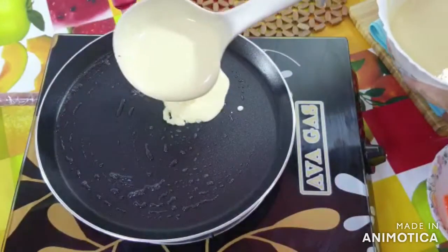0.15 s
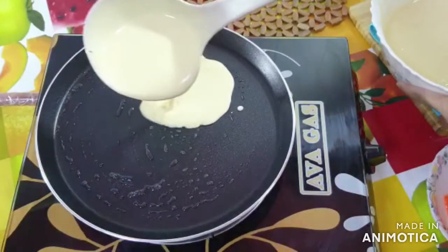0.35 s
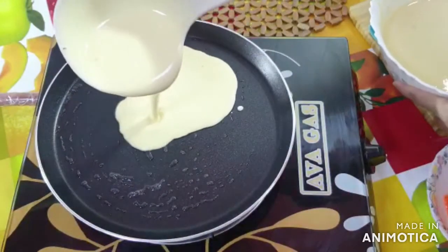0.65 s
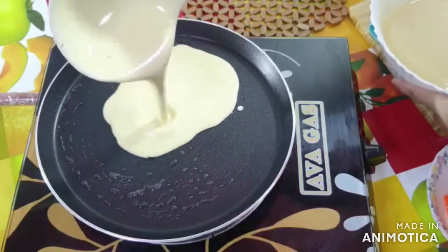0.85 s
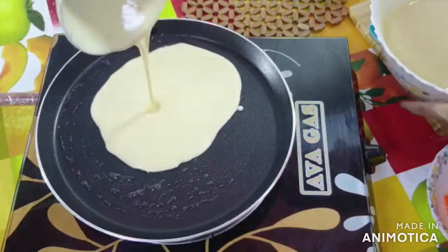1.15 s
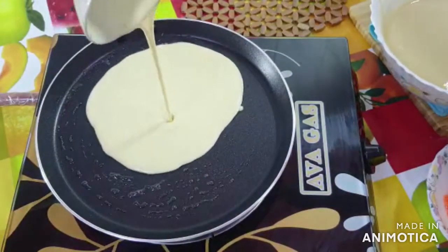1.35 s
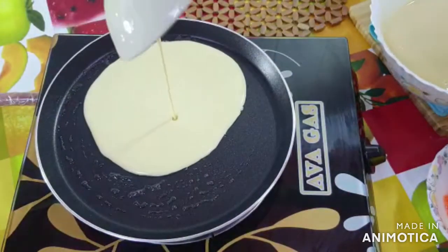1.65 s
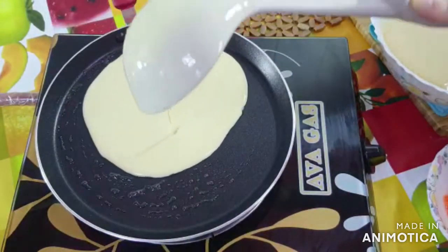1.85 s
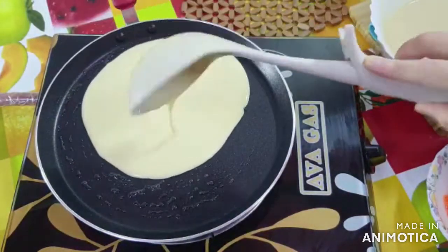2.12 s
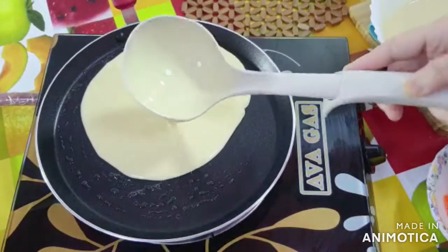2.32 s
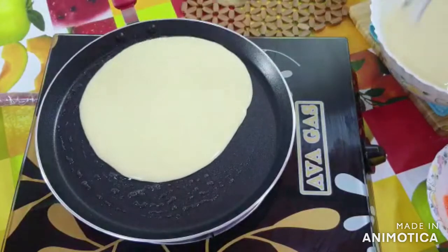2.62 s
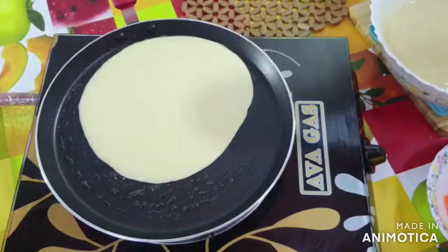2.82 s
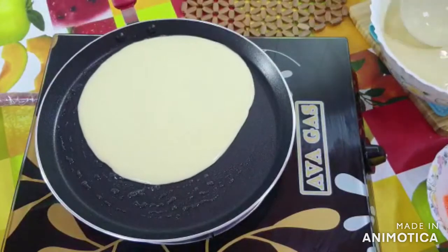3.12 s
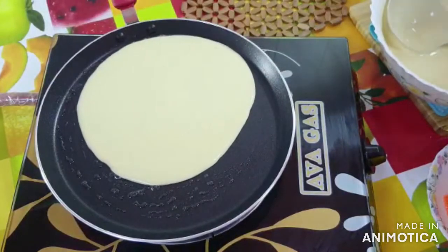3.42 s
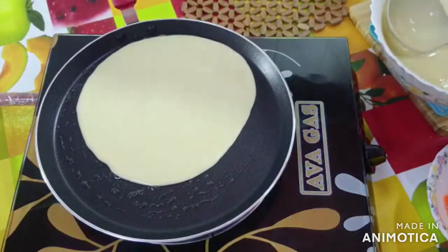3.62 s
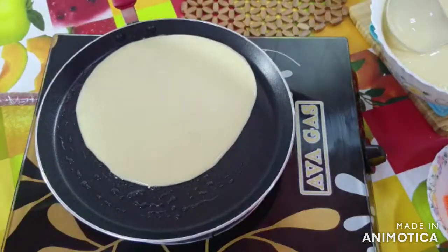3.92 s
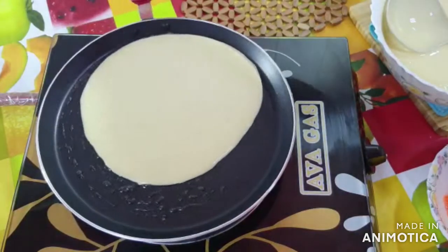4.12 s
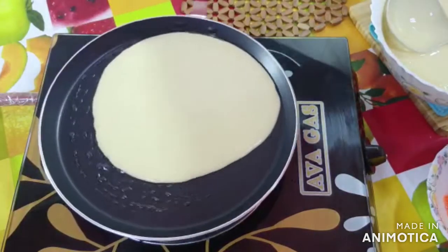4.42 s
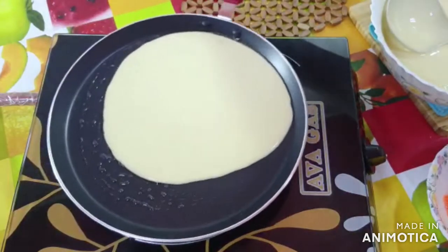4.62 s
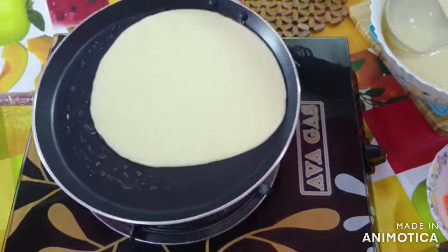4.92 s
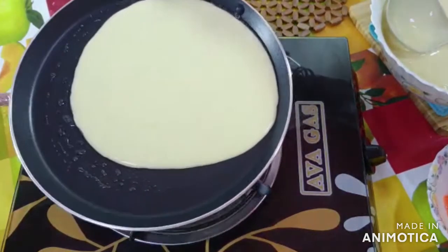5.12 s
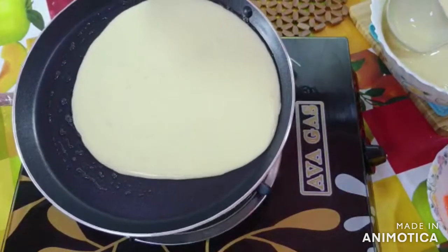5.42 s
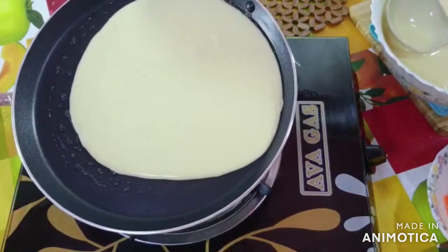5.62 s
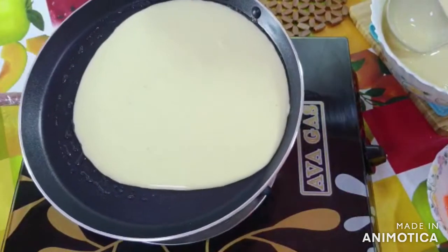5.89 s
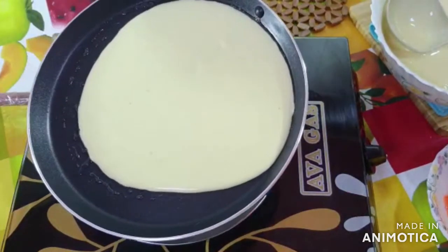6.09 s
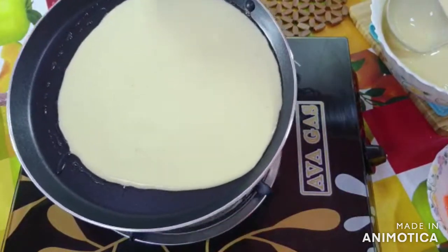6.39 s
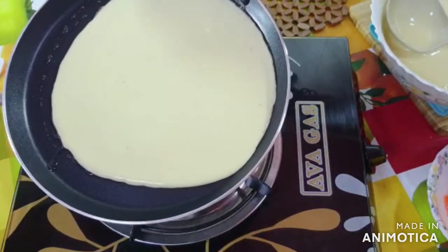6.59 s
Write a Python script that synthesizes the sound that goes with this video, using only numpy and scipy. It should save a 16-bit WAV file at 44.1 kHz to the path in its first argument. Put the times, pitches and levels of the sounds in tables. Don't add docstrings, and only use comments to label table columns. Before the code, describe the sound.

Batter hits an oiled pan with a loud crack and dense sizzle that thins out; later a bowl clanks and the pan scrapes across the stove.

```python
import sys
import numpy as np
from scipy import signal
from scipy.fft import rfft, irfft, next_fast_len
from scipy.io import wavfile
from scipy.ndimage import uniform_filter1d

SR = 44100
rng = np.random.default_rng(int(sys.argv[2]) if len(sys.argv) > 2 else 0)


def level_to_linear(level):
    exponent = np.asarray(level, float) / 20
    return 10 ** exponent


def generate_wav(sig):
    pcm = np.round(np.clip(np.atleast_2d(sig).T, -1, 1) * 32767).astype(np.int16)
    wavfile.write(sys.argv[1], SR, pcm)


N = 297675

# (frequency [Hz], level [dB], decay t60 [s])
STOVE = [(332, -6.5, 0.078), (362.6, 1, 0.15), (440, 2.5, 0.045), (531, 0, 0.049), (631, 1, 0.065),
         (754, -5, 0.2), (832, -11, 0.42), (1066, -6, 0.07), (1425, 5.5, 0.019), (1750, -0.5, 0.03),
         (2024, -7.5, 0.037)]


def evened(x):
    return x / np.sqrt(np.mean(x ** 2) + 1e-20)


def read(points, hz):
    f, value = np.transpose(points)
    return np.interp(np.log(hz + 1), np.log(f + 1), value)


def follow(rows, column, off_db=-120):
    times = [row[0] for row in rows]
    values = [row[column] for row in rows]
    return np.interp(np.arange(N) / SR, times, values, off_db, off_db)


def resonate(x, hz, width):
    r = np.exp(-np.pi * width / SR)
    return signal.lfilter([1, 0, -1], [1, -2 * r * np.cos(2 * np.pi * hz / SR), r * r], x)


def colour(x, points):
    size = next_fast_len(N)
    gain = level_to_linear(read(points, np.fft.rfftfreq(size, 1 / SR)))
    return irfft(rfft(x, size) * gain, size)[..., :N]


def bursts(per_s, spread_db, size=N):
    chance = rng.random((2, size))
    height = level_to_linear(spread_db * np.minimum(rng.exponential(1, (2, size)), 6))
    half = per_s / SR / 2
    return height * ((chance < half) * 1. - (chance > 1 - half))


def ring(modes, length=.7, upper_db=0, edge_hz=950, rough=0, crack_db=-40, clatter_db=-60):
    # (low [Hz], high [Hz])
    clatter_hz = (700, 6300)
    clatter_t60 = 0.24
    t = np.arange(int(length * SR)) / SR
    rise = np.minimum(t / 0.00039, 1)
    noise = rng.standard_normal(len(t))
    crack = level_to_linear(crack_db) * noise * np.exp(-t / 0.0017)
    clatter = signal.lfilter(*signal.butter(1, clatter_hz, "band", fs=SR), noise)
    sound = crack + level_to_linear(clatter_db - 60 * t / clatter_t60) * clatter
    for hz, db, t60 in modes:
        steps = rng.standard_normal((2, 40))
        steps[:, 0] = 0
        a, b = (np.interp(t, np.arange(40) * 0.0188, v) for v in steps)
        waver = (1 + .5 * rough * a) * np.exp(1.6j * rough * b)
        tone = (waver * np.exp(2j * np.pi * (hz * t + rng.random()))).real
        sound = sound + level_to_linear(db + upper_db * (hz > edge_hz) - 60 * t / t60) * tone
    return rise * sound


def add(mix, s, sound, peak_db, pan_db):
    part = mix[:, round(s * SR):][:, :len(sound)]
    sides = level_to_linear(peak_db + np.array([[pan_db], [-pan_db]]) / 2)
    part += (sides * sound / abs(sound).max())[:, :part.shape[1]]


def pops():
    # (time [s], peak [dB], pitch [Hz], ring [ms], broadband share [0-1])
    first_spit = [
        (.0014, -19, 1500, .8, .4),
    ]
    # (time [s], peak [dB], left minus right [dB])
    big_spit = (.0248, -4.5, -3.5)
    # (frequency [Hz], level [dB], decay t60 [s])
    pocket = [(790, -8, 0.0069), (1140, -17, 0.0046), (1540, -1, 0.0069), (1820, -5, 0.01),
              (2180, 0.5, 0.0089), (2920, 3.5, 0.0038), (3760, -0.5, 0.0053), (5960, -11, .004),
              (6530, -2.5, 0.0068), (7850, -19, .004), (10600, -5, 0.0035), (11970, -1, 0.008),
              (14000, -2, 0.0048)]
    # (time [s], peak [dB], pitch [Hz], ring [ms], broadband share [0-1])
    oil_pops = [(.0334, -16.5, 2300, 0.31, 0), (0.1498, -25.5, 7000, 0.85, 0.5),
                (1.1553, -26.5, 1970, 0.66, .5), (1.2224, -33.5, 1720, 1.6, 0.2),
                (1.4347, -19.5, 5940, 0.11, -0.07), (1.4688, -28, 2740, 0.46, 0),
                (1.4844, -28, 13000, .4, 1), (2.43, -22.5, 7500, 0.28, .6), (3.0834, -29, 14300, 1.1, 0.5),
                (4.3201, -32.5, 6300, 1, 0.5), (4.607, -32.5, 14000, .6, .5)]
    mix, t = np.zeros((2, N)), np.arange(900) / SR
    add(mix, big_spit[0], ring(pocket, length=.03, crack_db=-4.5), *big_spit[1:])
    noises = rng.standard_normal((len(oil_pops) + 1, 900))
    for (s, db, hz, ms, wide), noise in zip(first_spit + oil_pops, noises):
        share = np.clip(wide, 0, 1)
        snap = np.diff(noise, prepend=0) * np.exp(-t / 0.002) * 0.12
        bubble = np.sin(2 * np.pi * hz * t) * np.exp(-1000 * t / ms)
        add(mix, s + .0008, (1 - share) * bubble + share * snap, db, -1.5)
    return signal.sosfilt(signal.butter(2, 600, "high", fs=SR, output="sos"), mix)


def sizzle():
    # (frequency [Hz], level [dB])
    fizz_spectrum = [(850, -63), (1450, -4.5), (2280, -4), (4050, -2.5), (5200, -1), (5680, -2.5),
                     (6210, -1.5), (6730, -4), (7540, -2.5), (7910, -5), (10000, -8.5), (13000, -23),
                     (22000, -120)]
    # (frequency [Hz], level [dB])
    coarse_spectrum = [(150, -40), (250, -27), (283, -11.5), (425, -9.5), (551, -20), (785, -8), (862, -9),
                       (1060, -2.5), (1380, -5.5), (2150, -3), (3000, -7.5), (3900, -7.5), (6600, -120)]
    # (frequency [Hz], level [dB])
    spray_spectrum = [(5290, -25.5), (9000, -5), (13000, -1.5), (14200, -7), (15100, -2.5), (15700, -9)]
    # (time [s], vigour [dB])
    boil = [(0.0, -42.5), (0.15, -48), (0.6, -46.5), (1.37, -48), (1.56, -50), (1.73, -53), (2.42, -54),
            (2.97, -56.5), (3.19, -56), (3.44, -60.5), (3.85, -61), (4.1, -63.5), (4.64, -61), (5.36, -61),
            (5.64, -57), (5.86, -56), (6.11, -56), (6.75, -54.5)]
    # (time of peak [s], rise [s], fall [s], gain [dB])
    flares = [
        (0.001, .01, 0.18, 2.5),
        (3.55, 0.13, 0.2, 5.5),
        (4.35, 0.31, 0.26, 6),
    ]
    t, boil_db = np.arange(N) / SR, follow(boil, 1)
    vigour_db = boil_db + 55
    flare_db = np.zeros(N)
    for s, rise, fall, db in flares:
        flare_db += db * np.clip(np.minimum(1 + (t - s) / rise, 1 - (t - s) / fall), 0, 1)
    spread_s, spread_db = 1.1, -2.5
    sets_s, setting_db_per_s = 1.65, -3
    coarse_db = -58 + 0.93 * vigour_db + setting_db_per_s * np.maximum(t - sets_s, 0)
    coarse_db += spread_db * np.maximum(1 - t / spread_s, 0) + 2.8 * flare_db
    drying_db_per_s = -0.31
    spray_db = -52.5 + 0.64 * vigour_db + drying_db_per_s * t + 0.83 * flare_db
    flicker_db = 0.51 * evened(uniform_filter1d(rng.standard_normal(N), 1500))
    fizz = evened(colour(bursts(12000, 2.67), fizz_spectrum)) * level_to_linear(boil_db + flare_db + 3.0)
    coarse = evened(colour(bursts(5000, 2.2), coarse_spectrum)) * level_to_linear(coarse_db)
    spray = evened(colour(bursts(16000, 3.3), spray_spectrum)) * level_to_linear(spray_db)
    return (fizz + coarse + spray) * level_to_linear(flicker_db)


def hum():
    # (frequency [Hz], level [dB])
    rumble = [(15, -46), (25, -15.5), (69, -5.5), (98, 2.5), (124, -4), (154, -6), (301, -15), (361, -11.5),
              (393, -12), (413, -20.5), (753, -23.5), (818, -26), (860, -21), (1350, -36), (1760, -54),
              (2970, -120)]
    # (frequency [Hz], width [Hz], level [dB])
    motor = [(96, 10, -71), (130.3, 11, -73.5), (152.7, 6, -70), (192, 5.9, -78.5)]
    sound = level_to_linear(-64.5) * evened(colour(rng.standard_normal((2, N)), rumble))
    air = rng.standard_normal((2, N))
    for hz, width, db in motor:
        sound = sound + level_to_linear(db) * evened(resonate(air, hz, width))
    return sound


def cookware():
    # (time [s], peak [dB], left minus right [dB])
    tap = [
        (3.103, -32.5, -5.5),
    ]
    # (frequency [Hz], level [dB], decay t60 [s])
    rim = [(320, -5.5, 0.056), (361, -11, 0.23), (436, -15, 0.068), (536, -3, 0.076), (616, -2.5, .11),
           (714, -6.5, 0.1), (794, -8, 0.067), (940, -3.5, 0.044), (1690, -7.5, 0.04), (1920, -2, 0.038),
           (2140, -3, 0.036), (9900, -15, 0.15), (128, -14, 0.24), (195, -16, .2)]
    # (time [s], peak [dB], left minus right [dB])
    clank = [
        (3.39, -17, -5.5),
    ]
    # (frequency [Hz], level [dB], decay t60 [s])
    bowl = [(98.6, -18.5, 0.75), (136, -17.5, 0.39), (209, -23, 0.18), (292, -16.5, 0.16),
            (359, -10.5, 0.22), (443, -13, 0.07), (513, -8, 0.057), (602, -8, 0.082), (675, -5.5, 0.14),
            (711, -4.5, 0.07), (747, -5.5, 0.14), (828, -0.5, 0.099), (921, 3, 0.15), (1190, -11.5, 0.025),
            (1410, -6.5, 0.031), (1641, -5, 0.098), (2026, -4.5, 0.027), (2300, -3.5, 0.019),
            (2610, -12, 0.11), (3655, -11.5, 0.17), (4770, -15, 0.16), (6210, -6.5, 0.037),
            (6620, -6.5, 0.029), (7170, -2, 0.049), (8290, -14.5, 0.086), (9430, -16, 0.085),
            (10800, -30, 0.058), (12240, -15.5, 0.082), (15100, -26, 0.091)]
    # (time [s], peak [dB], hardness of the upper modes [dB])
    knocks = [
        (4.168, -30.5, 9),
        (4.525, -30, -3.5),
        (4.576, -37, -11),
        (4.609, -31.5, -3),
        (4.651, -35, -5),
    ]
    mix = np.zeros((2, N))
    s, db, pan_db = tap[0]
    add(mix, s, ring(rim, length=0.31, rough=0.36, crack_db=2.0), db + 1.1, pan_db)
    add(mix, s + .045, ring(rim[1:2], length=0.15, rough=0.14), db - 11, pan_db)
    s, db, pan_db = clank[0]
    add(mix, s, ring(bowl, length=.45, rough=0.56, crack_db=1.0, clatter_db=-16), db + 0.5, pan_db)
    add(mix, s + .115, ring(bowl, length=.3, upper_db=-9, rough=0.29), db - 14, pan_db)
    for s, db, upper_db in knocks:
        knock = ring(STOVE, length=.25, upper_db=upper_db, rough=0.75, crack_db=-12)
        add(mix, s, knock, db - 5.5, -1.5)
    return mix


def drag():
    # (time [s], grip [dB], speed [0-1])
    pull = [
        (4.03, -56, 0.16),
        (4.15, -52.5, 0.75),
        (4.18, -47, 0.7),
        (4.38, -47.5, 0.86),
        (4.515, -59, 0.95),
        (4.53, -42.5, 0.37),
        (4.65, -48, 0.53),
        (4.75, -52.5, 0.6),
        (4.81, -70, .5),
    ]
    span = slice(int(pull[0][0] * SR), int(pull[-1][0] * SR))
    grip_db = follow(pull, 1)[span]
    speed = np.clip(follow(pull, 2)[span], 0, 1)
    slips = bursts(1000, 2.0, size=len(speed))
    lean_db = -16 + 31 * speed
    low, rasp = 0, 0
    for hz, db, t60 in STOVE:
        mode = resonate(resonate(slips, hz, 3.3 / t60), hz, 0.59 * hz)
        mode = level_to_linear(db) * evened(mode)
        if hz < 950:
            low = low + mode * level_to_linear(lean_db * np.log2(hz / 520))
        else:
            rasp = rasp + mode
    grit = resonate(bursts(10000, 2.3, size=len(speed)), 4800, 6000)
    sound = evened(low) * level_to_linear(grip_db - 1.3)
    sound = sound + evened(rasp) * level_to_linear(grip_db - 19.5 + 13.5 * speed)
    sound = sound + evened(grit) * level_to_linear(-69.5 + 0.47 * (grip_db + 52.5) + 11.5 * speed)
    catch_s = 0.026
    out = np.zeros((2, N))
    out[:, span] = sound * np.minimum(np.arange(len(speed)) / SR / catch_s, 1)
    return out


def kitchen(x):
    # (frequency [Hz], t60 [s])
    room = [(100, 0.52), (500, 0.58), (2000, 0.44), (7000, 0.43), (15000, 0.27)]
    taps = np.zeros((2, SR // 2))
    at = np.arange(120, 22000, 20) + rng.integers(0, 20, (2, 1094))
    np.put_along_axis(taps, at, rng.choice([-1., 1.], at.shape), 1)
    hz, t, z = signal.stft(taps, SR, nperseg=256)
    fading = level_to_linear(-60 * t / read(room, hz)[:, None])
    tail = signal.istft(z * fading, SR, nperseg=256)[1]
    tail[:, :120] = 0
    return signal.oaconvolve(x.mean(0)[None], tail / np.linalg.norm(tail[0]), axes=1)[:, :N]


def ports(two):
    # (frequency [Hz], likeness [0-1])
    likeness = [(60, 0.76), (150, 0.86), (380, 0.59), (950, 0.28), (2380, 0.25), (5980, 0.026),
                (15000, 0.25)]
    # (frequency [Hz], phase [rad])
    phases = [(0, 0), (1120, 0.56), (3010, 2.5), (7320, 0.75), (11000, 4.5), (12300, 6.5), (15800, 9.5),
              (16500, 16)]
    # (frequency [Hz], left minus right [dB])
    balance = [(60, -2), (150, -4), (380, -4.5), (950, -1.5), (2380, -0.5), (5980, -0.5), (15000, -2)]
    size = next_fast_len(N + 2048)
    hz = np.fft.rfftfreq(size, 1 / SR)
    a, b = rfft(two, size) * np.clip((15840 - hz) / 40, 0, 1)
    same, lean = np.clip(read(likeness, hz), 0, 1), level_to_linear(read(balance, hz) / 2)
    right = same * a + np.sqrt(1 - same ** 2) * b
    right = right * np.exp(-1j * np.interp(hz, *np.transpose(phases)))
    return irfft(np.array([a * lean, right / lean]), size)[:, :N]


def scene():
    oil, pots, slide = pops(), cookware(), drag()
    echoes = kitchen(level_to_linear(0.5) * oil + level_to_linear(2.0) * pots + level_to_linear(-6.0) * slide)
    return ports(sizzle() + hum() + slide + echoes) + oil + pots


def roll_off(x):
    return signal.sosfilt(signal.butter(12, 17000, fs=SR, output="sos"), x)


def record(dry):
    # (from [s], to [s])
    brief_dip = (.0172, .0212)
    t = np.arange(N) / SR
    outside_s = np.maximum(brief_dip[0] - t, t - brief_dip[1])
    open_share = np.clip(outside_s / .0025 + .3, .005, 1)
    band_limit = signal.firwin(161, 16150, window=("kaiser", 9), fs=SR)
    limited = signal.oaconvolve(dry * open_share, band_limit[None], "same")
    return roll_off(limited)


dry = scene()
out = record(dry)
generate_wav(out)
```